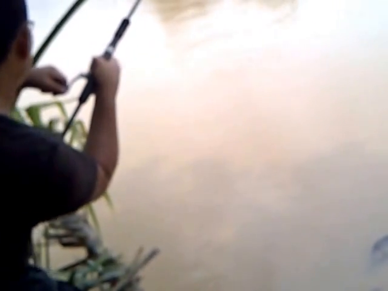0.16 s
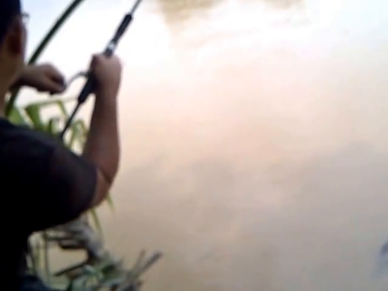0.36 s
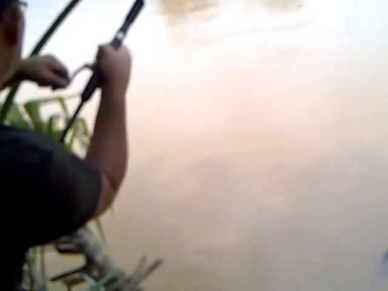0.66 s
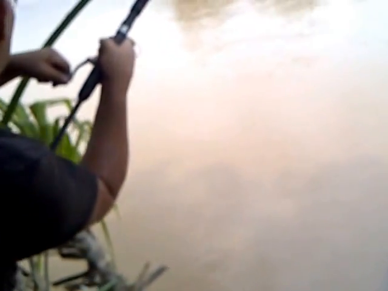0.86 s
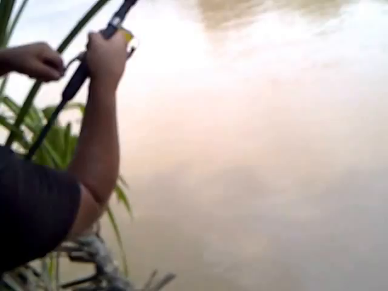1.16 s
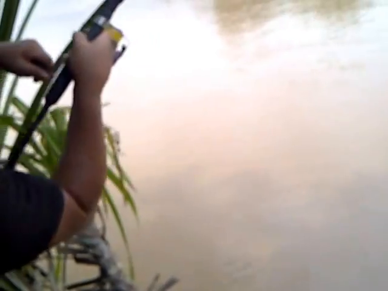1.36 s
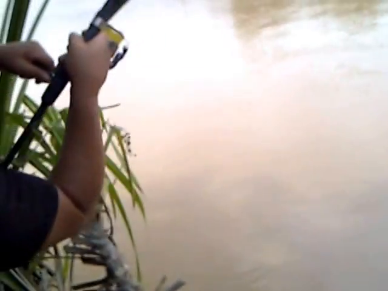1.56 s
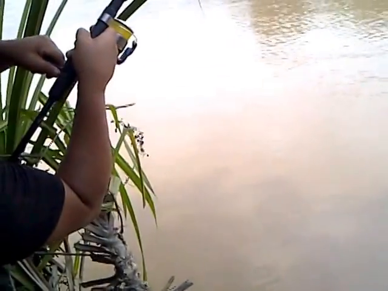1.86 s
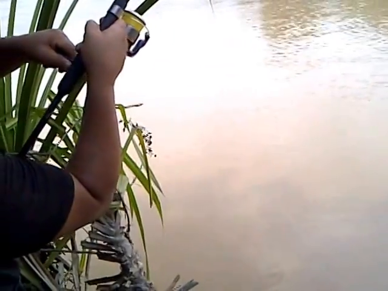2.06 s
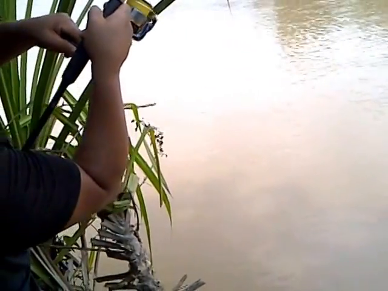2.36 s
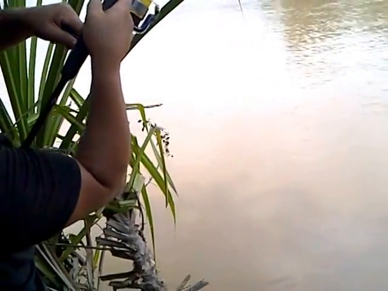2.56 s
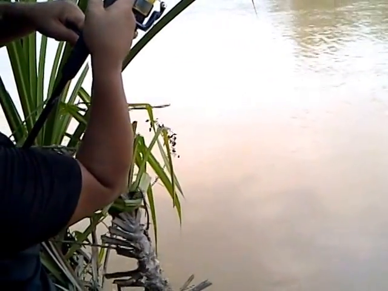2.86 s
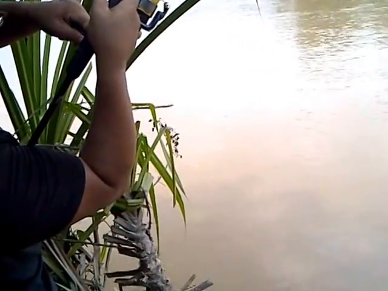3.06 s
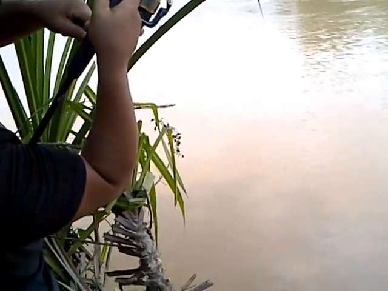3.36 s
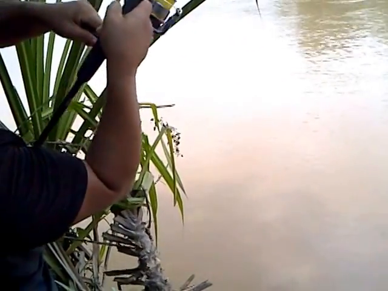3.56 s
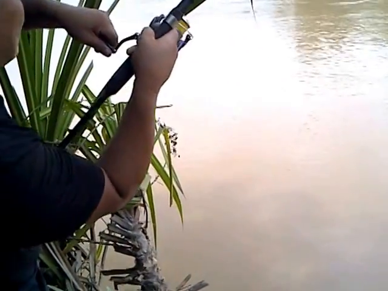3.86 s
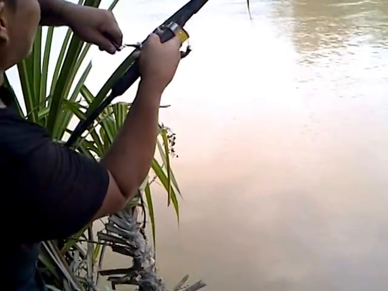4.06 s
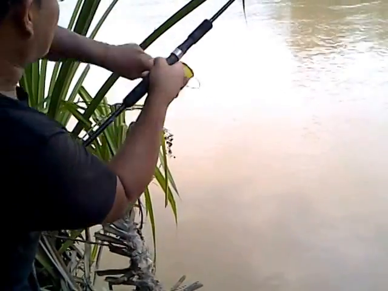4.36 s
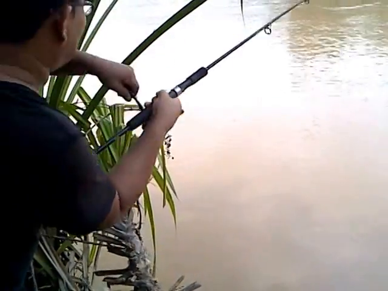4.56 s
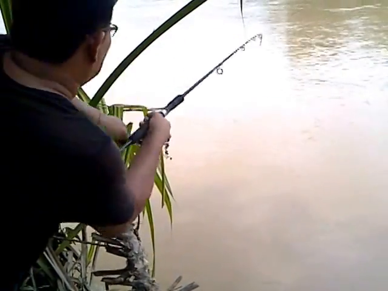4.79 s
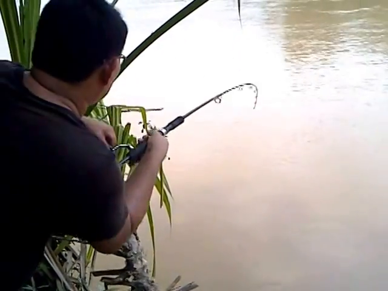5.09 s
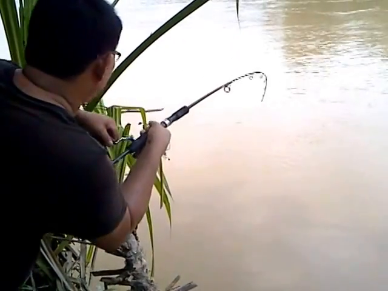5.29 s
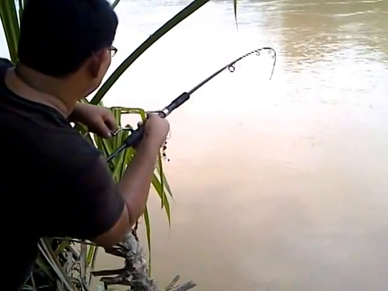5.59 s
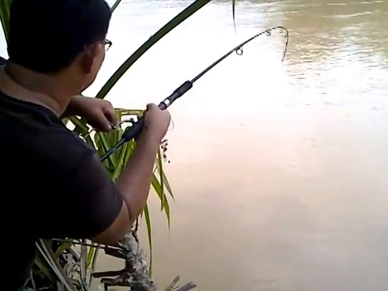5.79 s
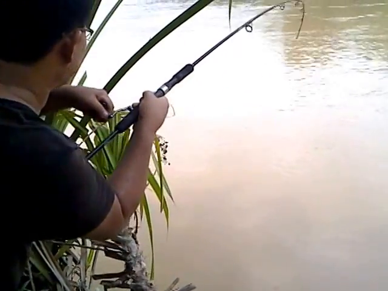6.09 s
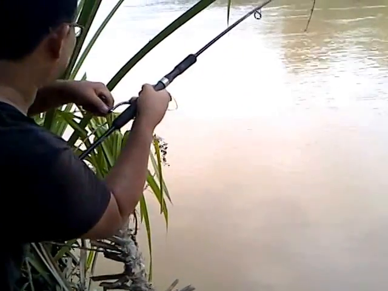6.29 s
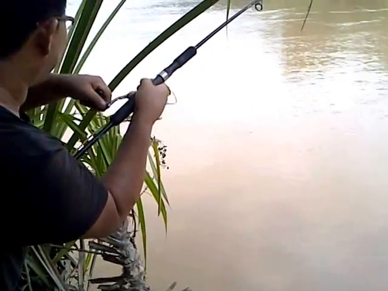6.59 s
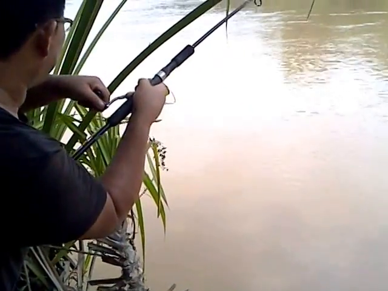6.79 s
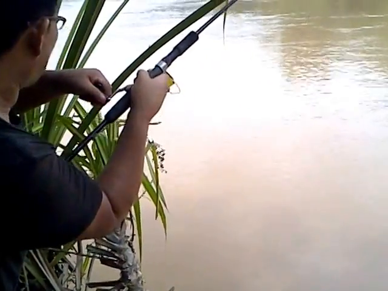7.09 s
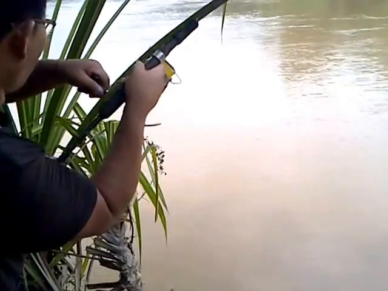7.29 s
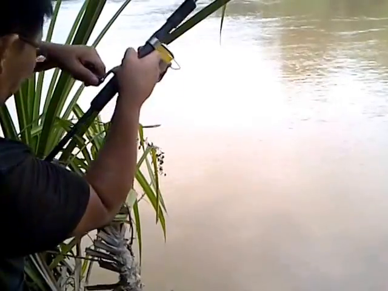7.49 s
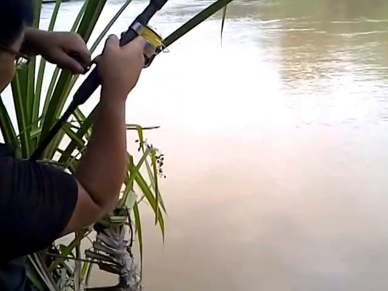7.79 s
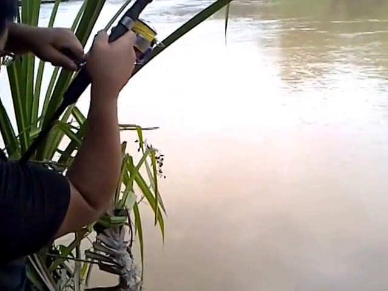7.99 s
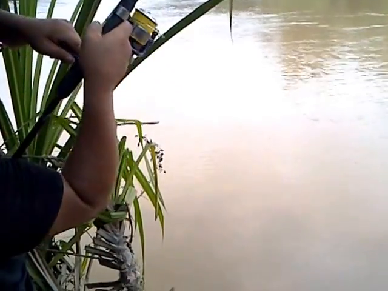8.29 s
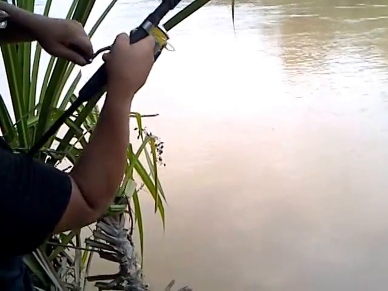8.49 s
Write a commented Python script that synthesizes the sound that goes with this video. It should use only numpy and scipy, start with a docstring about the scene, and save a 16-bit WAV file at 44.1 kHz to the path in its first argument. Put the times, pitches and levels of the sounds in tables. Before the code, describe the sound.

Insects drone high and steady by a river, with a cluster of sharp fishing reel clicks, faint rustles and a brief line squeak.

```python
"""On a leafy river bank, insects drone near 7 kHz, the nearest throbbing, over the river and a far motor.
In the first second and a half an angler plays a fish: impacts ring the rod and reel, clothes and leaves rub.
Near 3 s a bird whistles from the trees. From 4 to 5 s the taut line runs through the rings, and friction
makes it rasp and squeak. More rustles and knocks follow, and near 6.5 s the bird whistles again.
To the end the insects slowly tire, while the faint hum of the motor grows."""
import sys
import numpy as np
from scipy import signal
from scipy.fft import rfft, irfft
from scipy.io import wavfile

SR = 44100
rng = np.random.default_rng(int(sys.argv[2]) if len(sys.argv) > 2 else 0)


def file_out(sig):
    """Save sig as 16-bit WAV at sys.argv[1]."""
    # one column per channel
    cols = np.atleast_2d(sig).T
    # limit, then scale
    lim = np.clip(cols, -1, 1)
    pcm = np.round(lim * 32767).astype(np.int16)
    wavfile.write(sys.argv[1], SR, pcm)


N = 381024
TIME = np.arange(N) / SR

# clicks of the reel and rod fittings: (time [s], dry peak level [dB], treble tilt [dB/octave])
FITTING_CLICKS = [(.246, -38.5, -9.5), (0.613, -25.5, 1.5), (0.627, -27, 3.5), (.657, -24, 2),
                  (0.664, -26.5, 7.5), (.772, -36.5, 2), (1.014, -31, 2), (1.073, -31, 3),
                  (1.138, -28.5, 1), (1.144, -29, 6), (1.176, -18, 2), (1.1765, -20.5, -8), (1.186, -32, 7),
                  (1.2213, -31, 2), (1.244, -21, -2.5), (1.332, -33.5, 6.5), (3.243, -40.5, -20),
                  (3.578, -43, -12), (4.299, -34, -2), (4.579, -36, 3.5), (5.143, -41.5, 0),
                  (5.762, -35.5, -2), (6.447, -38.5, -6.5), (6.619, -41, -8.5)]
# modes of the fittings: (frequency [Hz], relative level [dB], t60 [s])
FITTING_MODES = [(1205, -3.5, 0.0073), (1590, -9, 0.01), (2160, -0.5, 0.0064), (2790, -5, 0.0061),
                 (4250, 2, 0.0033), (5230, -4.5, 0.0077), (6250, -6.5, 0.011), (6970, -0.5, 0.0082),
                 (7260, -8.5, 0.014)]
# dull knocks of the rod butt and grip: (time [s], strength [dB], frequency [Hz], t60 [s])
GRIP_KNOCKS = [(.613, -41.5, 400, 0.028), (.939, -33.5, 260, 0.012), (1.2453, -26, 455, 0.02),
               (3.206, -43, 803, 0.03), (3.244, -34.5, 835, 0.011), (4.366, -35.5, 470, 0.0082),
               (6.285, -37.5, 300, 0.015), (6.447, -35.5, 524, 0.016), (6.6185, -33, 646, 0.015)]
# runs of the line through the rings: (start [s], end [s], rasp level [dB])
LINE_RUNS = [(4.11, 4.347, -51.5), (4.433, 4.98, -56)]
# tugs that speed the line up: (time [s], squeak strength [dB], half length [s], top fundamental [Hz])
LINE_TUGS = [(4.17, -48.5, .032, 1630), (4.259, -55.5, .024, 1570), (4.539, -58, 0.046, 2650),
             (4.58, -52.5, 0.029, 2370), (4.734, -53, .03, 2202), (4.763, -51, .014, 1450),
             (4.875, -53, 0.0088, 1940), (4.943, -64, .05, 2750)]
# resonances of the rod and rings: (frequency [Hz], bandwidth [Hz], relative level [dB])
ROD_RESONANCES = [(1214, 98, -3.5), (1590, 390, -1), (2170, 320, -6.5), (2920, 1100, 2.5), (3960, 220, 0),
                  (4710, 820, -1), (5640, 600, 3)]
# movements that brush sleeves and leaves: (time [s], level [dB], half length [s])
SLEEVE_BRUSHES = [(0.86, -59.5, 0.053), (1.103, -55, 0.082), (1.76, -62.5, 0.2), (5.5, -62, 0.079),
                  (5.71, -55.5, .045)]
# spectrum of rubbing cloth and leaves: (frequency [Hz], relative level [dB])
RUSTLE_SPECTRUM = [(200, -19), (600, 8.5), (1700, 9), (3000, 8), (5200, 7), (8000, -40.5)]
# short dry rasps: (time [s], level [dB], centre frequency [Hz], half length [s])
DRY_RASPS = [(1.079, -44.5, 5430, 0.033), (1.76, -64, 4670, 0.13), (5.71, -58.5, 2910, 0.057),
             (6.424, -56, 5500, .03)]
# faint dry whirrs: (time [s], level [dB])
DRY_WHIRRS = [(.08, -64), (2.38, -66), (3.68, -64), (6.1, -67.5), (6.85, -72.5), (7.33, -67.5),
              (7.97, -66.5)]
# spectrum of the whirrs: (frequency [Hz], relative level [dB])
WHIRR_SPECTRUM = [(900, -31.5), (1500, 7.0), (2200, 5), (2900, -23.0), (8000, -32.5)]
# song of the nearest insect: (time [s], throb rate [Hz], pitch [Hz])
NEAR_INSECT = [(0, 19.6, 7380), (.5, 18, 7350), (2, 18, 7430), (3, 18.25, 7380), (5, 18.1, 7300),
               (6, 17.8, 7260), (7, 17.75, 7260), (8.64, 17.95, 7290)]
# spectrum of the many insects further off: (frequency [Hz], relative level [dB])
CHORUS_SPECTRUM = [(5600, -36.5), (6100, -17.5), (6450, -5), (6850, 0), (7100, 1), (7500, -3), (7660, -6),
                   (7820, -20), (8000, -38), (8330, -26.5), (8600, -43.5)]
# bird whistles: (time of the top [s], dry level [dB], top pitch [Hz], upsweep [Hz], slur length [s])
BIRD_WHISTLES = [(2.975, -49.5, 4970, 1394, .062), (6.49, -43, 5110, 2620, 0.039)]
# thin cricket tones: (start [s], end [s], pitch [Hz], level [dB])
CRICKET_TONES = [(0, 1.1, 5945, -68), (0, 8.64, 5930, -76), (2.1, 2.55, 5805, -69), (0, 8.64, 5795, -74)]
# spectrum of the river and distant land: (frequency [Hz], relative level [dB])
RIVER_SPECTRUM = [(30, -18), (110, -18), (160, -15.5), (240, -3.5), (400, 2.5), (700, -2), (1200, -5.5),
                  (2100, -7), (2800, -8.5), (5500, -9), (7500, -13.5), (8500, -42.5)]
# low rumble of handling the rod near 1 s, then gentle swells of the background wash: (time [s], rise [dB])
NOISE_SWELLS = [(1.05, 3), (2.75, 2), (5.65, 2)]
# harmonics of the motor: (multiple of the firing rate [-], level at mid-scene [dB])
MOTOR_HARMONICS = [(5, -89.5), (6, -82.5), (7, -78), (8, -80), (9, -79), (10, -83)]


def tackle(crack_db=-9, crack_t60=0.0089, contact_s=0.0006, detune=.025):
    """Impact excites damped modes: the fittings crack and ring, while the padded grip only thuds."""
    out, t = np.zeros(N), np.arange(SR // 10) / SR
    contact = np.minimum(t / contact_s, 1)
    for s, db, tilt_db in FITTING_CLICKS:
        ring = 0
        for hz, mode_db, t60 in FITTING_MODES:
            gain = undb(mode_db + tilt_db * np.log2(hz / 2500))
            mode = np.sin(2 * np.pi * hz * (1 + detune * rng.standard_normal()) * t)
            ring += gain * fade(t, t60) * mode * rng.choice([-1, 1])
        crack = undb(crack_db) * rng.standard_normal(len(t)) * fade(t, crack_t60)
        click = contact * (ring + crack)
        add(out, s, undb(db) * click / np.abs(click).max())
    out = foliage(out, t60=0.089, wet_db=-4.5)
    for s, db, hz, t60 in GRIP_KNOCKS:
        add(out, s, undb(db) * np.sin(2 * np.pi * hz * t) * fade(t, t60) * contact)
    return out


def fishing_line(creep_hz=1197, creep_db=-63, fundamental_db=-7, squeal_spread=0.76):
    """Stick-slip friction drives the rod's resonances; each tug lifts the squeak's pitch and level."""
    running = [between(start, end, edge_s=0.12) for start, end, _ in LINE_RUNS]
    drag = sum(undb(db) * gate for (_, _, db), gate in zip(LINE_RUNS, running))
    lifts_hz = [(top_hz - creep_hz) * swell(s, half_s) for s, _, half_s, top_hz in LINE_TUGS]
    hz = creep_hz + np.max(lifts_hz, axis=0)  # between tugs the line only creeps
    tugging = sum(undb(db) * swell(s, squeal_spread * half_s) for s, db, half_s, _ in LINE_TUGS)
    phase = turn(hz * (1 + .022 * walk(400) + .022 * walk(30)))
    grip = undb(3 * walk(160) + 6 * np.tanh(1.5 * walk(45)))  # breaks the squeak up
    squeak = unit((undb(fundamental_db) * np.sin(phase) + np.sin(2 * phase)) * grip)
    rasp = unit(sum(undb(db) * resonance(f, width, rate=900) for f, width, db in ROD_RESONANCES))
    return rasp * drag + squeak * (undb(creep_db) + tugging) * sum(running)


def rustle(crackle_db=-3, stir_db=-74.5):
    """Friction of cloth and leaves is a sum of many small slips, with a few crisper ticks."""
    crackle = grains(130, spread_db=2)
    brushing = sum(undb(db) * swell(s, half_s) for s, db, half_s in SLEEVE_BRUSHES)
    motion = undb(stir_db) + brushing  # leaves keep stirring between movements
    catch = undb(2 * walk(40))
    slips = grains(5000, spread_db=1.0) + undb(crackle_db) * crackle
    return colour(slips, RUSTLE_SPECTRUM) * motion * catch


def rasps(width_hz=750):
    """Band-limited noise under a smooth envelope is heard as a soft rasp, each in its own band."""
    return sum(resonance(hz, width_hz) * undb(db) * swell(s, half_s) for s, db, hz, half_s in DRY_RASPS)


def whirrs(half_s=0.13):
    """Dense impulses fuse into a mid-range whirr that swells and fades."""
    motion = sum(undb(db) * swell(s, half_s) for s, db in DRY_WHIRRS)
    return motion * colour(grains(1200, spread_db=3), WHIRR_SPECTRUM)


def insects(start_db=-47, tiring_db_per_s=0.4141, waver_db=.3, near_db=-2.0):
    """Clicks ring each insect's resonator: the far ones merge, the nearest is amplitude-modulated."""
    throb_hz, pitch_hz = curves(NEAR_INSECT)
    throb = 1 + .42 * np.cos(turn(throb_hz))
    near = unit(resonance(pitch_hz, width_hz=260) * throb)
    far = colour(rng.standard_normal(N), CHORUS_SPECTRUM) * throb ** .12  # neighbours loosely keep time
    level_db = start_db - tiring_db_per_s * TIME + waver_db * walk(1)
    return unit(far + undb(near_db) * near) * undb(level_db)


def bird(lead_s=0.11, rise_s=.056, slur_hz=697, foot_softer_db=20.5):
    """Frequency modulation of a nearly pure tone: each whistle swells upward, levels off, slurs down."""
    out = 0
    for s, db, top_hz, sweep_hz, slur_s in BIRD_WHISTLES:
        before = np.maximum(s - TIME, 0) / rise_s
        after = np.clip((TIME - s) / slur_s, 0, 1)
        foot = 1 - np.exp(-before ** 3)  # 1 at the foot of the upsweep, 0 at its top
        hz = top_hz - sweep_hz * foot - slur_hz * after ** 3
        phase = turn(hz * (1 + .012 * walk(400)))
        overtone = np.sin(2 * phase) * np.clip((3400 - hz) / 600, 0, 1)  # only a low start is reedy
        envelope = undb(db - foot_softer_db * foot ** 2) * between(s - lead_s, s + slur_s)
        out += (np.sin(phase) + overtone) * envelope
    return foliage(out, t60=.42, wet_db=0)


def river(wash_db=-61, swell_half_s=.35):
    """Broadband noise forms the wash, sparse impulses its lapping; the first swell is rod handling."""
    noise = rng.standard_normal(N) + 0.32 * grains(300, spread_db=4.5)
    rise_db = sum(db * swell(s, swell_half_s) for s, db in NOISE_SWELLS)
    return colour(noise, RIVER_SPECTRUM) * undb(wash_db + rise_db + .5 * walk(15))


def crickets():
    """Narrow resonances give distant crickets their thin, grainy tones, some held, some brief."""
    return sum(resonance(hz, width_hz=80) * undb(db) * between(start, end, edge_s=0.11)
               for start, end, hz, db in CRICKET_TONES)


def motor(firing_hz=34.75, growth_db_per_s=0.66):
    """Periodic firing makes a harmonic series, heard far off as an unsteady hum that slowly grows."""
    phase = turn(firing_hz * (1 + .008 * walk(8)))
    hum = sum(undb(db) * unit(np.sin(k * phase)) for k, db in MOTOR_HARMONICS)
    growth_db = growth_db_per_s * (TIME - TIME.mean())
    return hum * undb(growth_db + 1.5 * walk(17))


def foliage(x, t60, wet_db, onset_s=0.0034):
    """Scattering from leaves and trunks adds a diffuse, exponentially decaying tail."""
    t = np.arange(SR) / SR
    tail = rng.standard_normal(SR) * fade(t, t60) * np.minimum(t / onset_s, 1)
    return x + undb(wet_db) * signal.fftconvolve(x, tail / np.linalg.norm(tail))[:N]


def microphone(x, low_hz):
    """The small capsule acts as a high-pass filter and passes little bass."""
    return signal.sosfilt(signal.butter(3, low_hz, "high", fs=SR, output="sos"), x)


def resonance(hz, width_hz, rate=2500):
    """Random impulses excite one resonance, whose centre may move; rms 1."""
    impulses = grains(rate, spread_db=-0.5) + 1j * grains(rate, spread_db=0)
    envelope = signal.sosfilt(signal.butter(3, width_hz / 2, fs=SR, output="sos"), impulses)
    carrier = np.exp(1j * turn(hz + np.zeros(N)))
    return unit(np.real(envelope * carrier))


def grains(rate, spread_db):
    """Shot noise: random impulses of uneven size, on average rate a second; rms 1."""
    out = np.zeros(N)
    where = np.flatnonzero(rng.random(N) < rate / SR)
    size, scatter = rng.standard_normal((len(where), 2)).T
    out[where] = size * undb(spread_db * scatter)
    return unit(out)


def walk(rate):
    """Low-pass noise of rms 1 that changes about rate times a second."""
    hz = np.arange(N // 2 + 1) * SR / N
    return unit(irfft(rfft(rng.standard_normal(N)) * np.exp(-(hz / rate) ** 2), N))


def colour(x, points):
    """Spectral shaping of x by (frequency [Hz], level [dB]) points; rms 1."""
    hz, db = np.transpose(points)
    bins = np.maximum(np.arange(len(x) // 2 + 1) * SR / len(x), 1)
    gain = undb(np.interp(np.log(bins), np.log(hz), db))
    return unit(irfft(rfft(x) * gain, len(x)))


def swell(middle_s, half_s):
    """A Gaussian envelope of peak 1, the shape of one movement."""
    return np.exp(-((TIME - middle_s) / half_s) ** 2)


def between(start, end, edge_s=0.0048):
    """A gate with linear ramps at its edges."""
    return np.clip(np.minimum(TIME - start, end - TIME) / edge_s + .5, 0, 1)


def curves(table):
    """Linear interpolation of each column over the times in the first."""
    s, *columns = np.transpose(table)
    return [np.interp(TIME, s, c) for c in columns]


def turn(hz):
    """Phase is the running integral of frequency."""
    return 2 * np.pi * np.cumsum(hz) / SR


def fade(t, t60):
    """Free exponential decay, 60 dB in t60."""
    return np.exp(-np.log(1000) * t / t60)


def add(out, s, x):
    """Superpose x on out from time s."""
    i = int(s * SR)
    out[i:i + len(x)] += x[:N - i]


def undb(db):
    """Decibels to amplitude ratio."""
    return 10 ** (np.asarray(db) / 20)


def unit(x):
    """Normalise to rms 1."""
    return x / np.sqrt(np.mean(x ** 2) + 1e-20)


def scene():
    """Superposition: the pressures of all sources on the bank add in one channel."""
    background = insects() + crickets() + river() + motor()
    rubbing = rustle() + whirrs() + rasps() + fishing_line()
    return (background + rubbing + bird() + microphone(tackle(), low_hz=257))[None]


def record(dry, top_hz=8400):
    """Band limiting: a small camera acts as a steep low-pass filter."""
    return signal.sosfilt(signal.ellip(10, .2, 70, top_hz, fs=SR, output="sos"), dry)


dry = scene()
out = record(dry)
file_out(out)
```